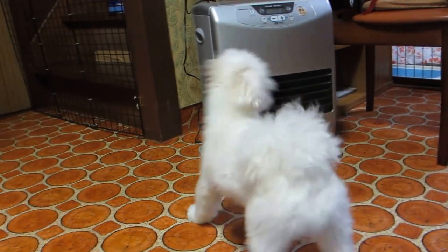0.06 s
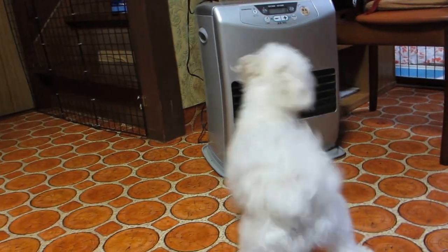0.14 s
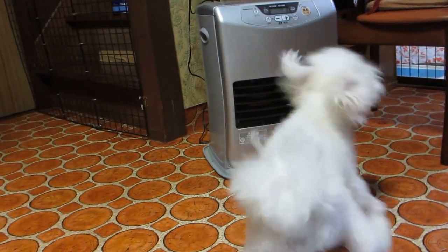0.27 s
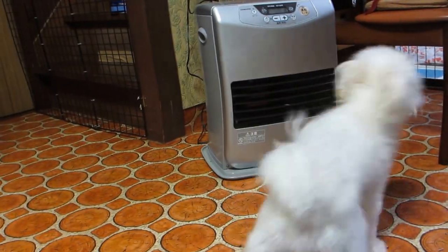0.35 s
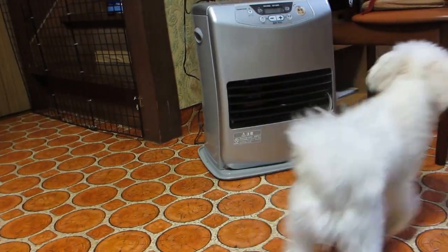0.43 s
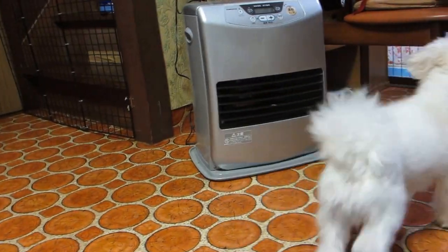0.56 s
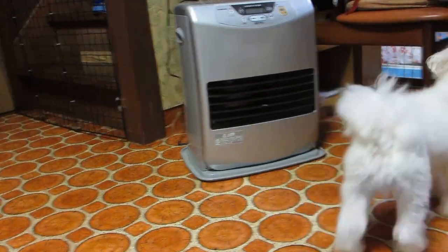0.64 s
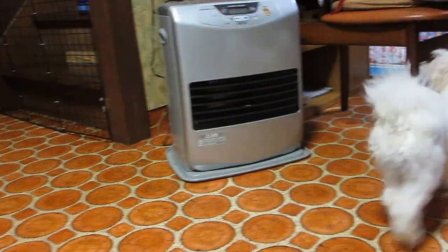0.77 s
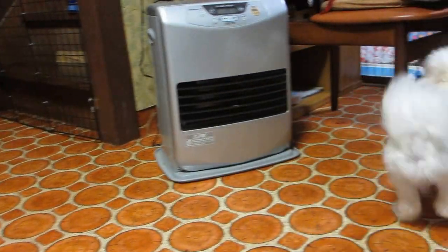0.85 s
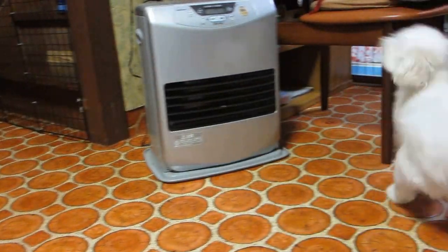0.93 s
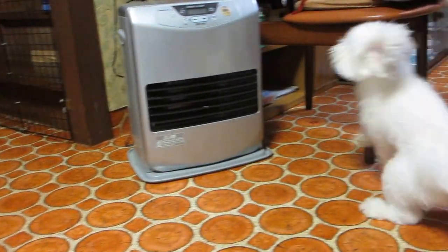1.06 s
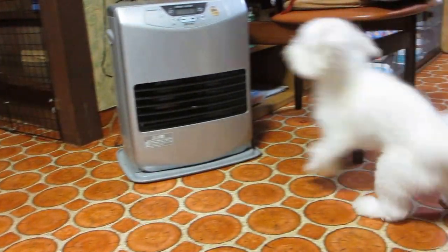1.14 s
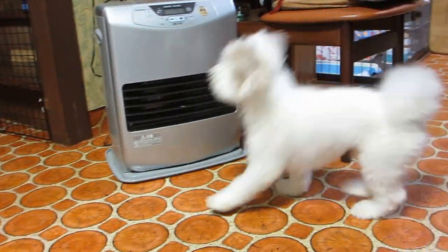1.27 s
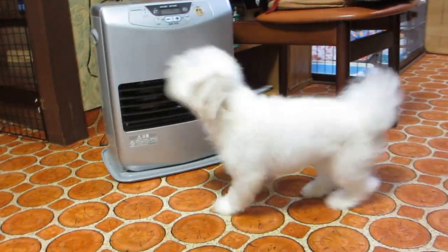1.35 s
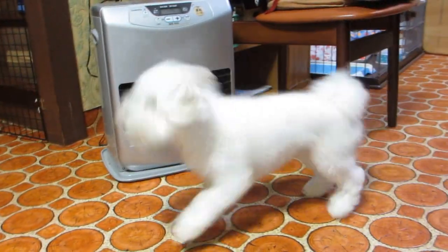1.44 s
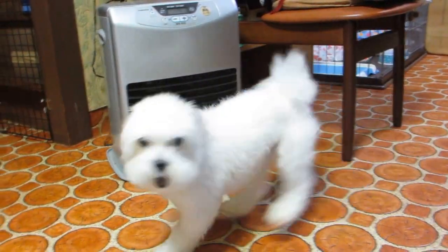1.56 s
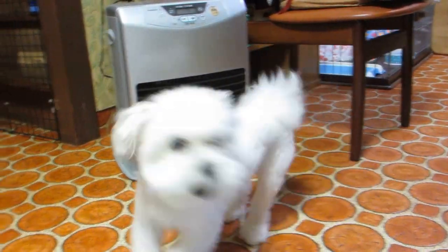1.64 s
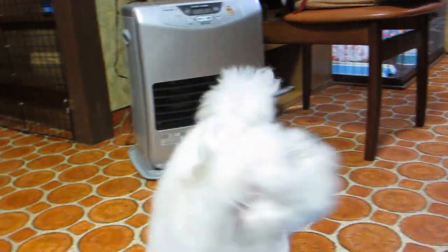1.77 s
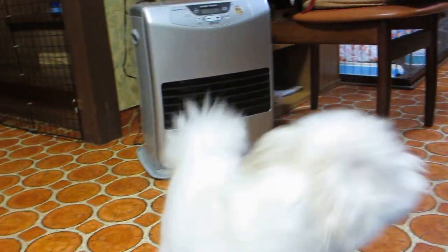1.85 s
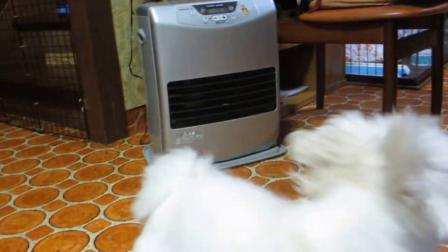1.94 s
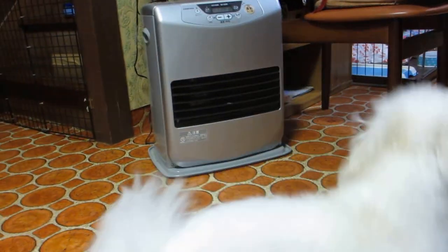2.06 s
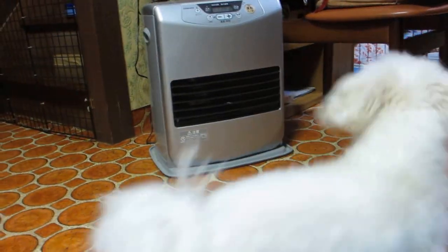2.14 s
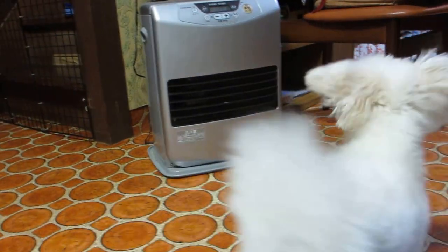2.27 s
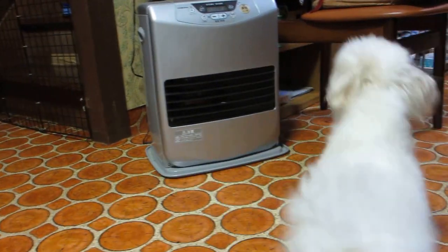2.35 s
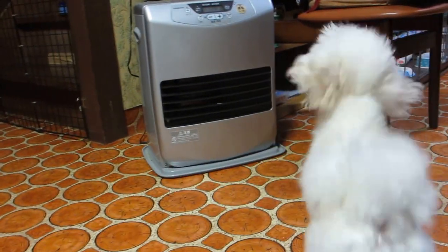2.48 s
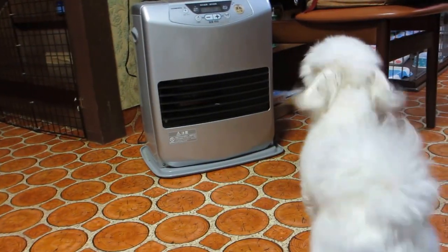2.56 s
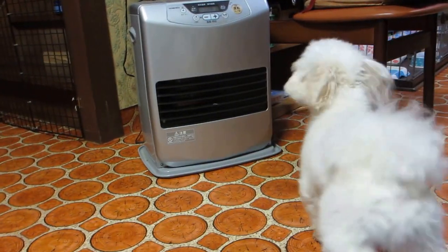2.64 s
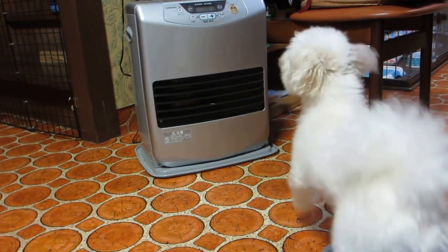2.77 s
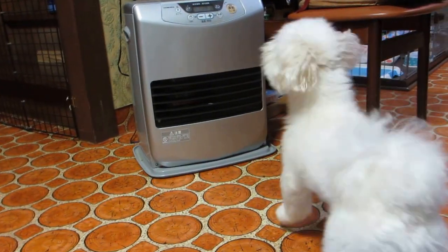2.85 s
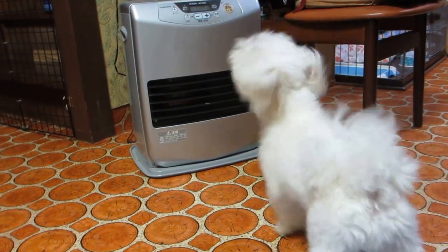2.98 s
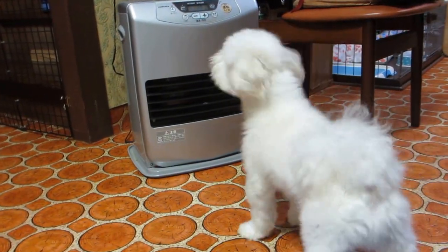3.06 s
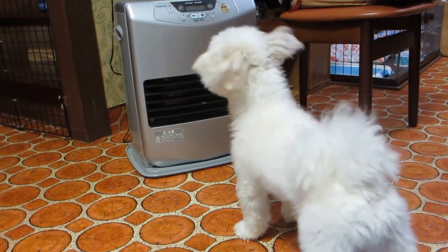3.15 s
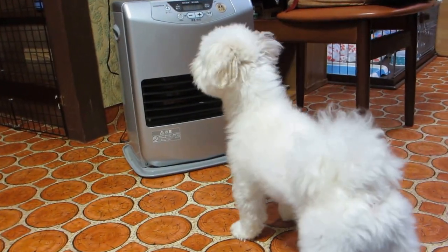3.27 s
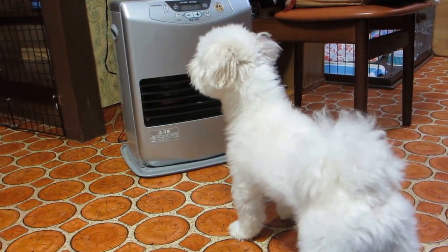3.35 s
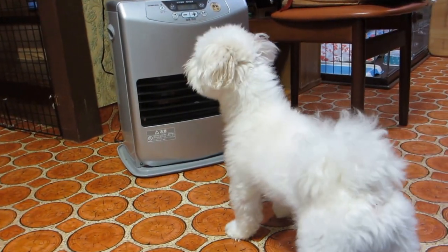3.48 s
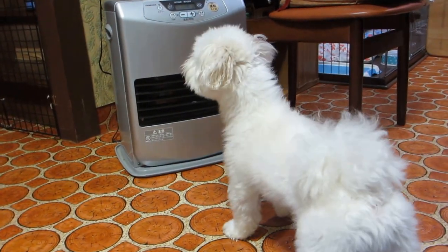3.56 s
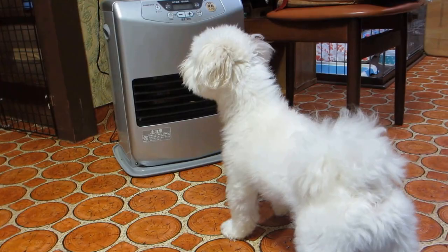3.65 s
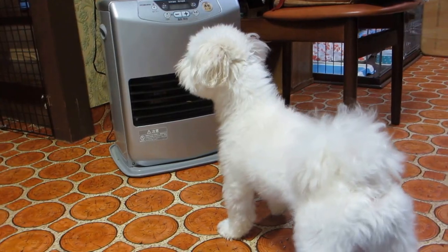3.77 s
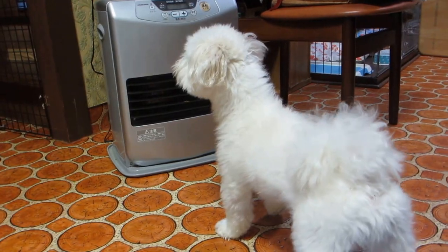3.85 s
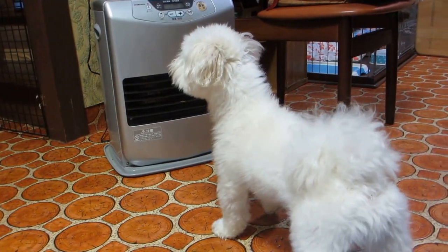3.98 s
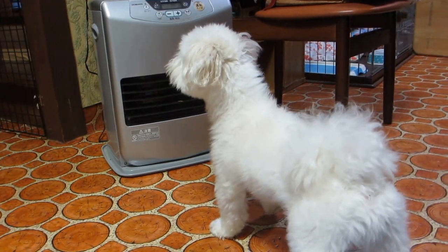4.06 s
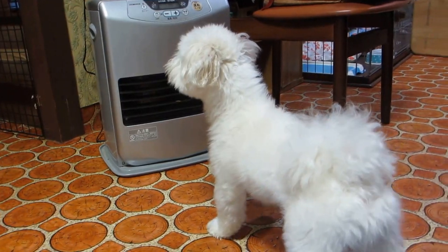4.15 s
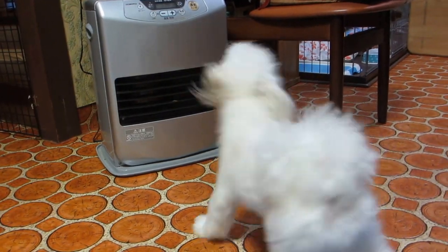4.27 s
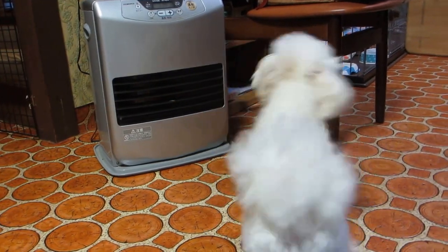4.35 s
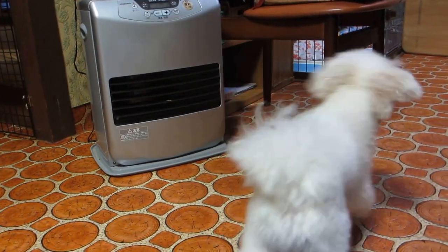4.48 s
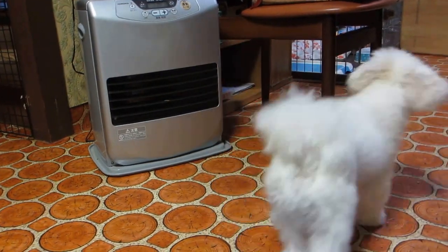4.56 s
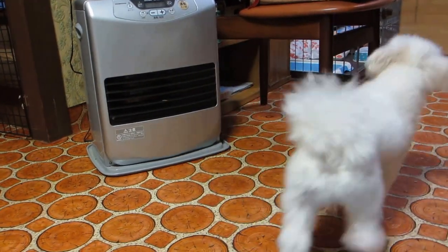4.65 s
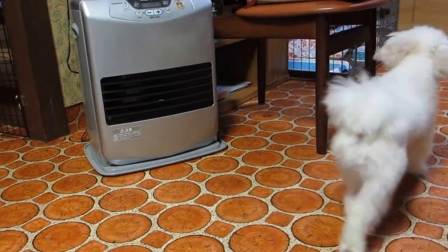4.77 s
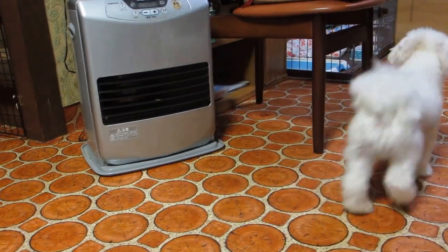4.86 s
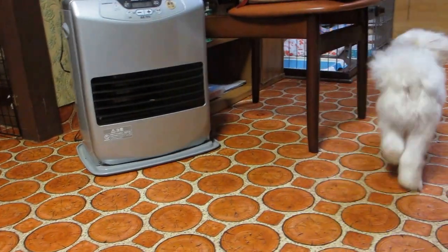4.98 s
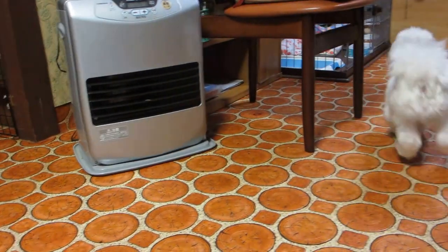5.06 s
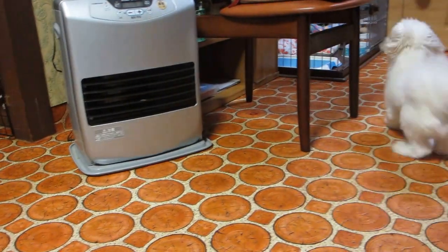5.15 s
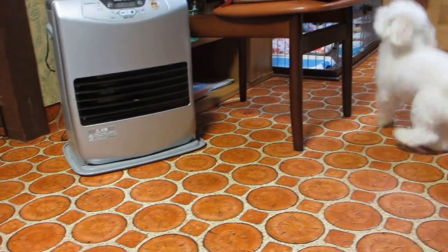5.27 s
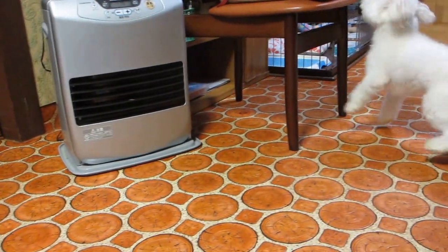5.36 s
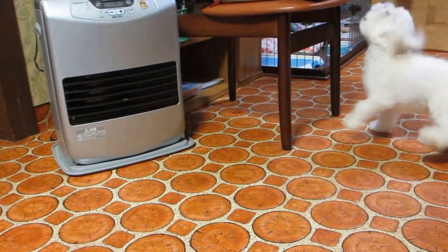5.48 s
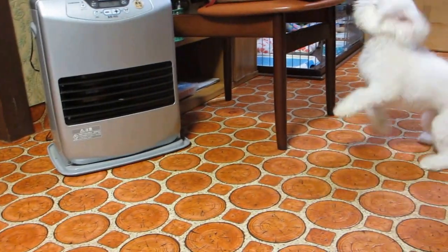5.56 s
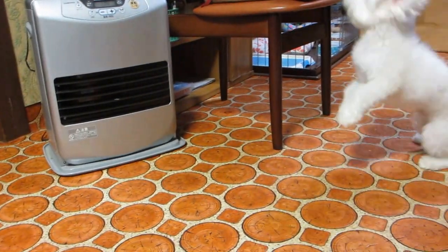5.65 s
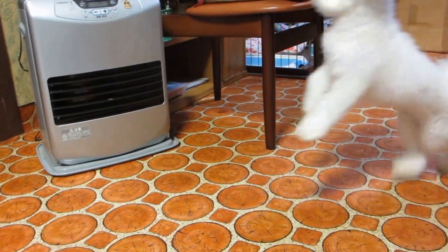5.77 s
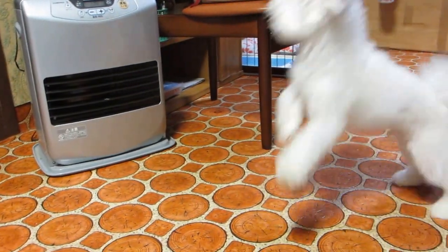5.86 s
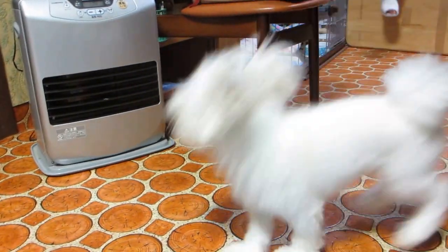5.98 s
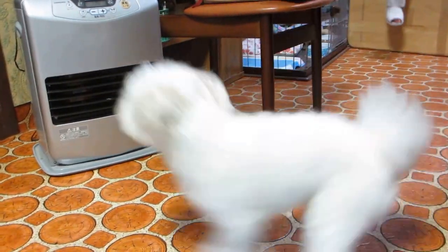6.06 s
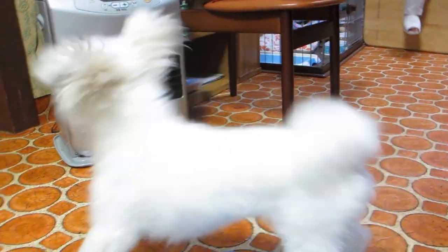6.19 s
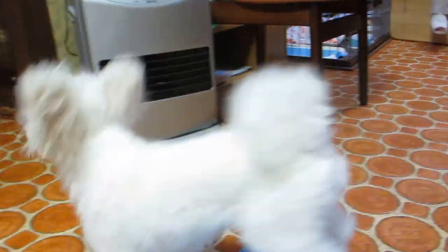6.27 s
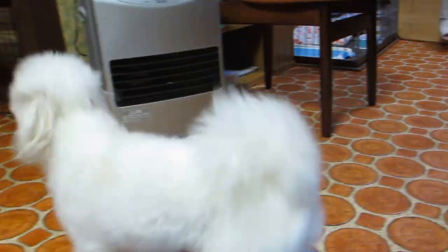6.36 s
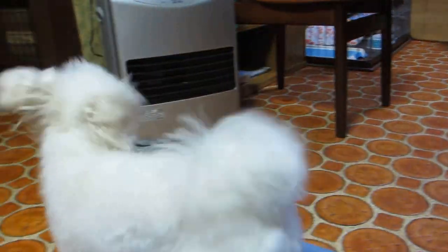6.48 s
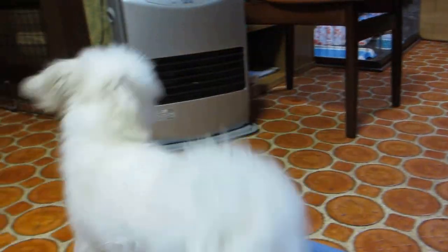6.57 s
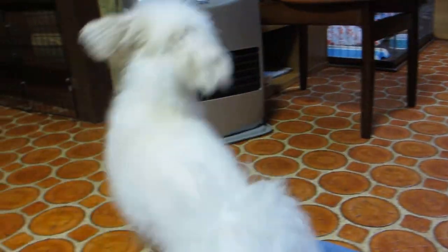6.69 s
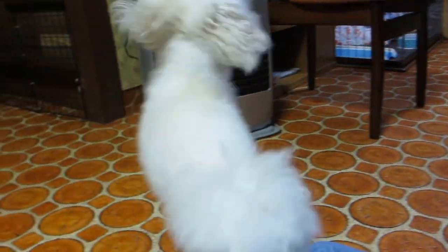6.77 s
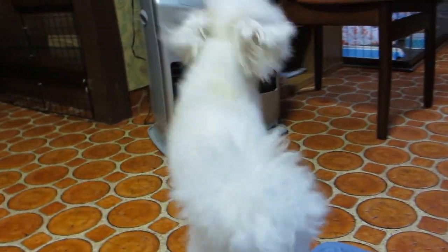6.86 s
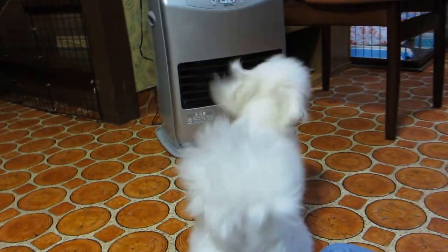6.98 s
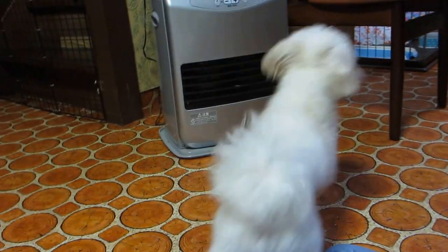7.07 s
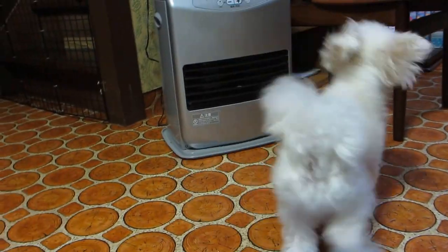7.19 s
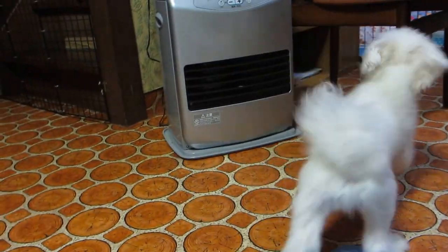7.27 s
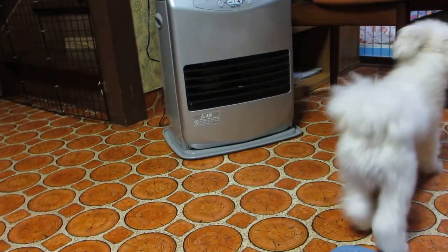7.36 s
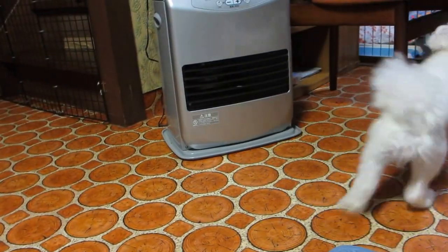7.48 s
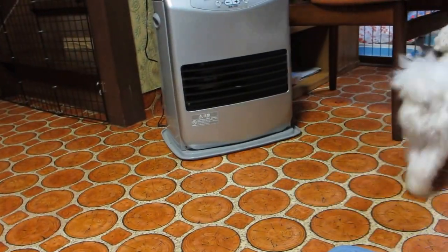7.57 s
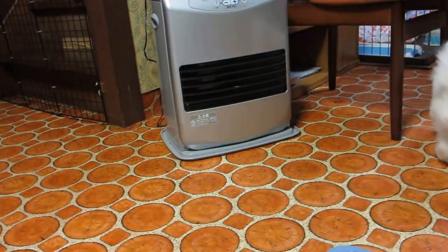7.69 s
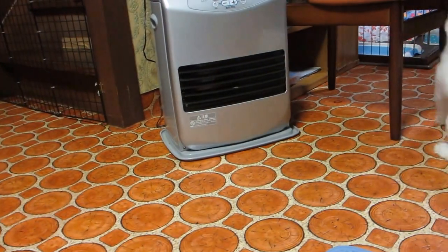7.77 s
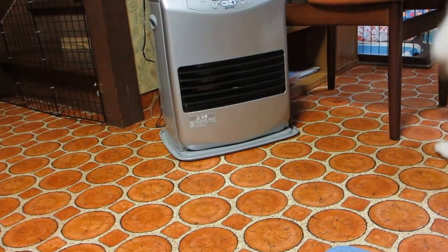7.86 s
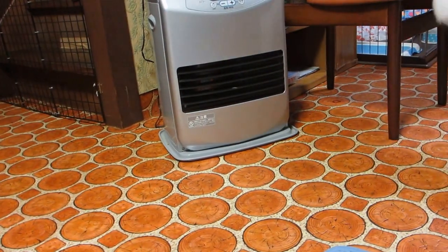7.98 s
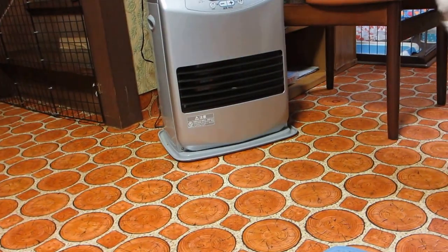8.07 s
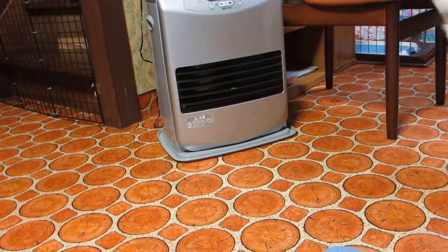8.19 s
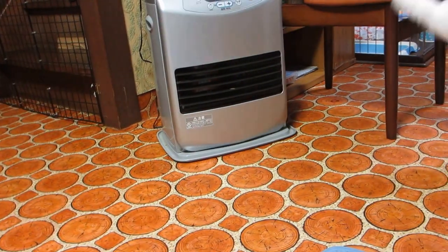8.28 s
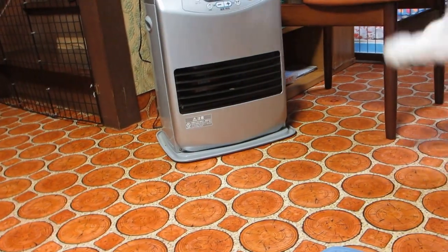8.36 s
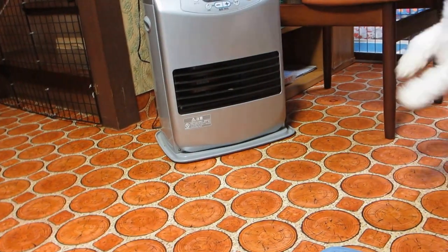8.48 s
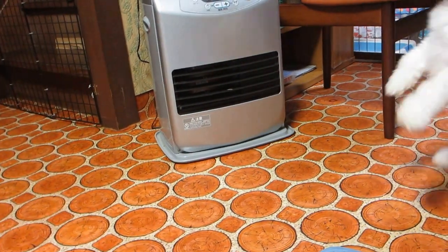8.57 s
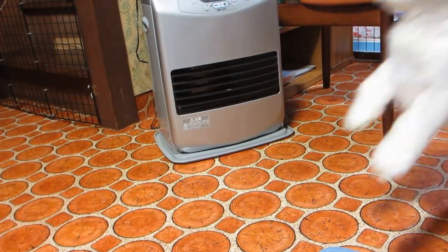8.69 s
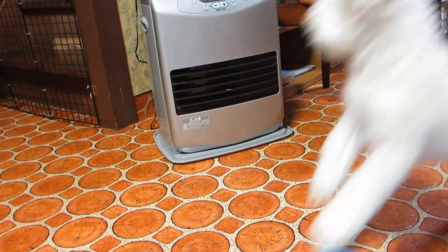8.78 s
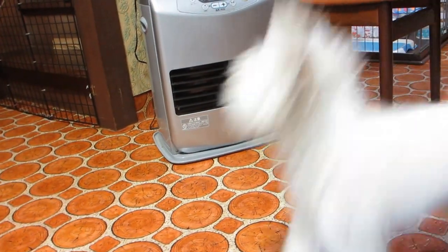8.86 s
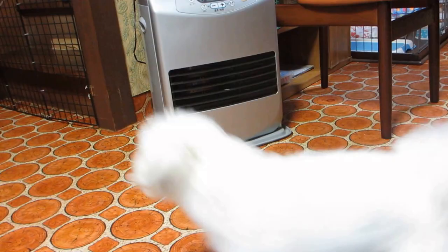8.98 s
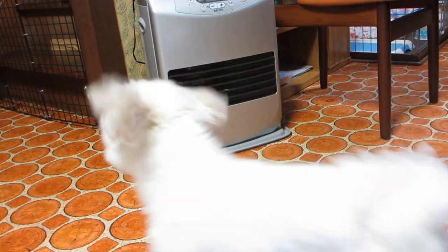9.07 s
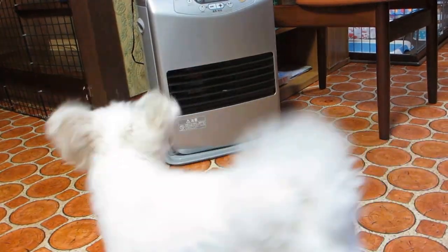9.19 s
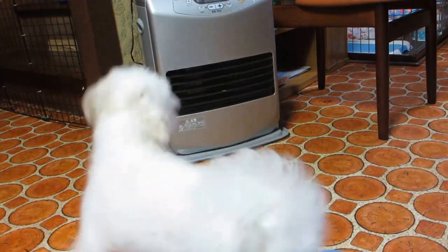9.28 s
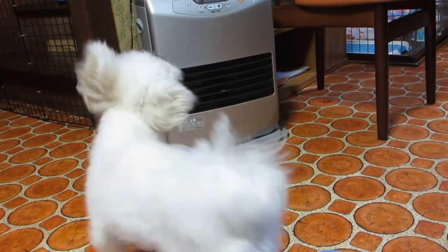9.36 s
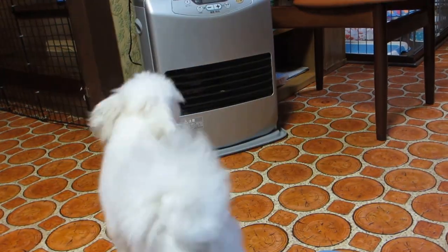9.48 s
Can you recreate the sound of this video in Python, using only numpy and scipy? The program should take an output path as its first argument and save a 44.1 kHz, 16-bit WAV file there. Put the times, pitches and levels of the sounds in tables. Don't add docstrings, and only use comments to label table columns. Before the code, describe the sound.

A small dog barks hoarsely and yelps high and clear, over and over, in a hard-floored room, with soft paw thuds and claw scuffs.

```python
import sys
import numpy as np
from scipy import signal
from scipy.fft import rfft, irfft, next_fast_len
from scipy.io import wavfile
from scipy.ndimage import uniform_filter1d, minimum_filter1d, map_coordinates

SR = 44100
rng = np.random.default_rng(int(sys.argv[2]) if len(sys.argv) > 2 else 0)


def file_out(sig):
    cols = np.atleast_2d(sig).T
    lim = np.clip(cols, -1, 1)
    pcm = np.round(lim * 32767).astype(np.int16)
    wavfile.write(sys.argv[1], SR, pcm)


def gain_from_db(level_db):
    decades = np.asarray(level_db, float) / 20
    return 10 ** decades


N = 420273

# (time [s], step after [s], voice breaks after [s], first pitch [Hz], top pitch [Hz])
YELPS = [
    (0.667, .013, .112, 1271, 2024),
    (1.746, .021, .1, 1233, 1674),
    (2.049, .033, .101, 1173, 1791),
    (4.714, .012, .115, 1374, 1731),
    (5.017, 0.052, .086, 1390, 1579),
    (5.436, .04, .112, 1120, 1756),
    (5.877, .05, .112, 1212, 1694),
    (7.554, .02, 0.078, 1257, 1487),
    (8.102, .022, .1, 1214, 1557),
]
# (onset [dB], after the step [dB], at the break [dB], last gasp [dB], duration of the step [s])
YELP_EFFORT = [
    (-19.5, -28, -44, -60, 0.048),
    (-8.5, -11.5, -21, -32, .02),
    (-22.5, -20.5, -26, -51, .03),
    (-18.5, -12.5, -19, -56, .04),
    (-26.5, -28, -27.5, -51, .015),
    (-12.5, -16, -12.5, -46.5, .018),
    (-17, -14, -16.5, -37, .013),
    (-23, -21, -23.5, -59.5, .012),
    (-15, -16, -13.5, -39, .014),
]
# (time [s], climb [s], first pitch [Hz], last pitch [Hz], peak level [dB])
SCOOPS = [
    (0.926, .037, 814, 1176, -11),
    (7.105, .046, 678.6, 716, -14),
    (8.512, .036, 661, 1174, -13),
]
# (time [s], length [s], top pitch [Hz], onset level [dB], middle level [dB])
HOARSE_BARKS = [
    (0.198, 0.16, 1258, -15, -16.5),
    (2.932, 0.15, 1241, -21, -17),
    (4.268, .155, 1187, -22, -17.5),
    (6.325, .138, 1260, -14, -15.5),
    (9.331, .16, 1210, -18, -15),
]
# (time [s], length [s], top pitch [Hz], onset level [dB], middle level [dB])
SHARP_BARKS = [
    (2.467, .134, 1197, -11, -16.5),
    (8.862, .14, 1210, -11, -16.5),
]
# (time [s], onset peak after [s], crack after [s], squeal [Hz], onset level [dB])
CRACKED_BARKS = [
    (1.319, .021, .078, 1904, -7.5),
    (6.763, .035, .095, 1741, -9),
]
# (mouth resonance [Hz], overtones [dB], facing the camera [dB], left-right [dB])
MUZZLE = [(1120, -26.5, -1, 0.7), (900, -14, -3, -0.5), (1058.5, -17.5, -2, 1.4), (1263, -21.5, -2.5, 0.7),
          (901, -19.5, -6, -0.5), (790, -13, -7, 0.5), (1085, -21.5, -7.5, 0), (950, -32.5, -5, 1.5),
          (980, -36, -5, 1.5), (830, -14.5, 2.5, -0.5), (800, -8.5, -1.5, 0.4), (856, -16, -0.8, 0.2),
          (850, -13.5, 1, 0.5), (1066, -27, -5, 0.5), (1210, -23, -7, 1.5), (1000, -20.5, -8, 0.3),
          (780, -12, -4.5, 0.9), (920, -20, -5.5, 0.8), (1010, -14, -0.6, 2), (1150, -19, -5, 0.7),
          (1080, -37.5, -6, 1.7)]
# (frequency [Hz], level [dB])
THROAT = [(200, -50), (400, -20.5), (600, -20.5), (850, -3.5), (1150, 2.5), (1800, -6), (3000, 4),
          (3700, -8), (5000, -14), (7000, -27.5), (10000, -23.5), (15500, -38)]
# (multiple of the mouth resonance [1], density [dB per Hz])
RASP = [(.14, -47.5), (.3, -41), (.55, -23.5), (.78, -8.5), (1, -6.5), (1.25, -5), (1.55, -5), (2, -19.5),
        (3.1, -32), (4.6, -49), (7.3, -69.5)]
# (frequency [Hz], density [dB per Hz])
HISS = [(3000, -33.5), (5000, -12.5), (7000, -13), (10000, 1.5), (13000, -2.5), (15600, -15)]
# (time [s], peak level [dB], pitch [Hz])
PAWS = [(0.116, -53.5, 122), (0.239, -42.5, 206), (0.933, -43, 144), (1.325, -46.5, 164.2),
        (1.639, -46, 96.6), (1.883, -48.5, 101.8), (2.076, -47, 89.2), (2.365, -45.5, 96.7),
        (2.808, -47, 69.7), (4.228, -45, 72.4), (4.43, -53, 161), (4.628, -50, 74.5), (4.729, -42.5, 104.5),
        (5.448, -51, 148.5), (5.576, -49, 154), (6.006, -42, 63), (6.144, -36.5, 86.2),
        (6.429, -47.5, 60.8), (6.8, -48.5, 207), (7.029, -50.5, 83.7), (7.27, -48.5, 69.1),
        (7.776, -47, 156.2), (7.967, -42.5, 76.5), (8.14, -36, 99.7), (8.253, -41.5, 152.6),
        (8.415, -50.5, 152.1), (8.794, -43.5, 82.5), (8.914, -48.5, 117.5), (9.033, -49, 66.6),
        (9.368, -48, 191.9)]
# (time [s], peak level [dB], decay by 60 dB [s])
CLAWS = [
    (0.119, -57, 0.1),
    (3.87, -72.5, 0.1),
    (4.199, -56.5, 0.079),
    (5.299, -47.5, 0.18),
    (6.183, -43.5, 0.22),
    (7.971, -45.5, 0.15),
]
# (time [s], peak level [dB])
TICKS = [
    (5.7886, -55),
    (5.8396, -63),
    (7.0329, -62),
    (7.4344, -70.5),
    (7.8216, -70),
    (7.9129, -65.5),
    (7.9731, -58),
    (8.797, -70),
]
# (time [s], floor shaking level [dB])
SHUFFLE = [(0.0, -70), (0.9, -65), (1.8, -70), (2.4, -66), (3.05, -69.5), (3.3, -92), (4.15, -86),
           (4.4, -68), (5.2, -66), (6.15, -61.5), (6.6, -72), (7.8, -72.5), (8.12, -64.5), (8.5, -69.5),
           (9.53, -71)]
# (frequency [Hz], density [dB per Hz])
SCUFF = [(120, -33), (200, -6), (528, -9), (1120, -9.5), (1510, -16), (1830, -21), (9000, -47),
         (11700, -87.5), (19800, -120)]
# (frequency [Hz], density [dB per Hz])
BOARDS = [(25, -20.5), (45, -6), (70, -1), (110, -6), (170, -12), (300, -25), (600, -59.5)]
# (frequency [Hz], density [dB per Hz])
FUR = [(600, -30), (2000, -4), (5000, -3), (11000, -6), (15500, -16)]
# (frequency [Hz], density [dB per Hz])
FAN = [
    [(25, -6.5), (60, -1), (90, -10), (400, -13.5), (800, -18), (1150, -14.5), (1600, -20), (2900, -38.5),
     (5000, -48.5), (15000, -48)],
    [(25, -4.5), (170, -3.5), (370, -9), (480, -8.5), (620, -10.5), (2500, -41), (15000, -57)],
]
FAN_LEVELS = [-72, -65]
# (frequency [Hz], decay by 60 dB [s])
ROOM = [(200, 0.53), (1200, 0.34), (2500, 0.37), (5000, 0.38), (12000, 0.36)]
# (frequency [Hz], gain [1])
APART = [(100, 0.87), (600, 0.18), (2000, 0.24), (5000, 0.52), (10000, 1)]
# (frequency [Hz], left leads by [radians])
LEAD = [(60, -2.4), (200, -1.9), (520, -1.3), (1250, -1.5), (1800, -.5), (2500, -.3), (5000, 0)]
# (frequency [Hz], left-right [dB])
TILT = [(60, 6.5), (150, 8), (350, 10), (700, 4.5), (1300, -4.5), (4400, -3.5), (8000, -7.5), (14000, -4)]

SNAP_S, SNAP_DB = .006, 12
CREEP_HZ_PER_S, CREEP, STEP_REACH = 3300, .33, .86
BREAK_S, GASP_S, SLACK_HZ, ROUGH_PER_DB = .02, .055, 870, 0.04
SCOOP_HELD_S, SCOOP_TO_HZ, SCOOP_FADE_S, SCOOP_FADE_DB = .086, 1211, .07, 23.5
RISE, MIDDLE, LATE, SAG = .17, .42, .69, 0.75
GROWL_DB, GROWL_DB_PER_KHZ, DOUBLING_DB = 0.53, 42, -13
FOCUS, FOCUS_WIDTH_HZ = 0.65, 140
UPPER, UPPER_FOCUS = 1.55, 0.62
THUD_T60_S = 0.13
CEILING = .8


def dog():
    yelps = [yelp(*row, *effort) for row, effort in zip(YELPS, YELP_EFFORT)]
    clear = yelps + [scoop(*row) for row in SCOOPS]
    sharp = [bark(*row, first_hz=780, rough=0.37) for row in SHARP_BARKS]
    sharp += [cracked(*row) for row in CRACKED_BARKS]
    hoarse = [bark(*row, first_hz=1059.6, rough=0.53) for row in HOARSE_BARKS]
    calls = [(rows, count) for count, group in [(1, clear), (2, sharp), (3, hoarse)] for rows in group]
    out = np.zeros((2, N))
    for (mouth_hz, overtone_db, facing_db, pan_db), (rows, repeat) in zip(MUZZLE, sorted(calls)):
        between_db = GROWL_DB - GROWL_DB_PER_KHZ * (mouth_hz / 1000 - 1) if repeat > 2 else DOUBLING_DB
        call = gain_from_db(-2.0) * voice(mouth_hz, repeat, between_db, overtone_db, facing_db, np.array(rows))
        pan = gain_from_db([[pan_db / 2], [-pan_db / 2]])
        add(out, call * pan, rows[0][0])
        add(out, room(call) * pan, rows[0][0])
    return out


def yelp(s, step, end, first_hz, top_hz, onset_db, stepped_db, end_db, gasp_db, glide):
    slack = ROUGH_PER_DB * (end_db - gasp_db)
    rise_hz = top_hz - first_hz
    crept_hz = first_hz + min(CREEP_HZ_PER_S * step, CREEP * rise_hz)
    return [(s, first_hz / 1.03, onset_db - SNAP_DB, .02),
            (s + SNAP_S, first_hz, onset_db, .06),
            (s + step, crept_hz, (onset_db + stepped_db) / 2 + 0.2, .04),
            (s + step + glide, first_hz + STEP_REACH * rise_hz, stepped_db, .07),
            (s + end, top_hz, end_db, .07),
            (s + end + BREAK_S, .79 * top_hz, (end_db + gasp_db) / 2 + 1.07, .45 * slack),
            (s + end + GASP_S, SLACK_HZ, gasp_db, slack)]


def scoop(s, climb, first_hz, last_hz, db):
    held = s + SCOOP_HELD_S
    return [(s, first_hz, db - 15.5, .3),
            (s + climb / 2, .6 * first_hz + .4 * SCOOP_TO_HZ, db - 8.5, .33),
            (s + climb, .955 * SCOOP_TO_HZ, db, .07),
            (held, SCOOP_TO_HZ, db - 3.5, .05),
            (held + 0.39 * SCOOP_FADE_S, 0.33 * SCOOP_TO_HZ + .6 * last_hz, db - 15, .15),
            (held + SCOOP_FADE_S, last_hz, db - SCOOP_FADE_DB, .15)]


def bark(s, length, top_hz, onset_db, middle_db, first_hz, rough):
    return [(s, first_hz, onset_db - 17, .2),
            (s + RISE * length, .92 * top_hz, onset_db, rough),
            (s + MIDDLE * length, .98 * top_hz, middle_db, rough + 0.13),
            (s + LATE * length, .99 * top_hz, middle_db - 8, .75),
            (s + length, SAG * top_hz, middle_db - 21.5, .8)]


def cracked(s, rise, crack, squeal_hz, db):
    return [(s, 780, db - 32, .4),
            (s + .55 * rise, 960, db - 12.5, .55),
            (s + rise, 1180, db, .2),
            (s + rise + .025, 1305, db - 8.5, .4),
            (s + crack, 1340, db - 8.5, .45),
            (s + crack + .014, squeal_hz, db - 12.5, .13),
            (s + crack + 0.044, .97 * squeal_hz, db - 14.5, .2),
            (s + crack + 0.065, SLACK_HZ, db - 23, .35)]


def voice(mouth_hz, repeat, between_db, overtone_db, facing_db, rows):
    s, pitch, effort_db, rough = rows.T
    t = s[0] + np.arange(SR // 5) / SR
    size, age = len(t), t - s[0]
    pitch = np.interp(t, s, pitch)
    rough = np.clip(np.interp(t, s, rough), 0, 1)
    level = np.interp(t, [*s, s[-1] + .015], [*gain_from_db(effort_db), 0]) * (1 - np.exp(-age / 0.0024)) ** 2
    phase = 2 * np.pi * np.cumsum(pitch) / SR

    k = np.arange(1, 9 * repeat + 1)[:, None] / repeat
    loose = (rough + 0.015) * np.clip(1.7 * k - .3, 0, 1)
    weight_db = along(THROAT, k * pitch) + overtone_db * np.clip(1.752 * k - 1.9, 0, 1)
    weight_db += between_db * (k % 1 > 0)
    weight_db -= 5 * np.clip(k - 1, 0, None) * np.exp(-age / 0.028)
    weight_db += 6 * np.log10(level / level.max() + 0.037) * np.clip(k - 1, 0, 2)
    sway = np.cos(2.325 * k) * wobble(112, size) + np.sin(2.11 * k) * wobble(69.54, size)
    weight_db += (9 * loose + 1.5 * np.minimum(k, 2)) * np.minimum(sway, 1.1) + 5 * rough * (k < .5)
    jitter = 2.14 * np.minimum(k, 3) * loose * wobble(300, size)
    lines = np.sum(gain_from_db(weight_db) * np.sin(k * phase + jitter), axis=0)

    aspiration = gain_from_db(-32.5) * noise([(900, -30.5), (1600, 3), (3600, -6.0), (5500, -18.5), (9000, -45)], size)
    puffs = 1 + 0.54 * np.sin(phase / repeat)
    rasp = 0.96 * rough ** 1.54 * puffs * noise(np.multiply(RASP, [mouth_hz, 1]), size)
    hiss_level = gain_from_db(-41.5 + 4.0 * wobble(97, size)) * (1 + 1.6 * rough)
    hiss = hiss_level * np.minimum(age / 0.026, 1) ** 0.91 * noise(HISS, size)

    def mouth(hz):
        beam = gain_from_db(facing_db / (1 + (4000 / (hz + 1)) ** 6))
        first = FOCUS * (repeat > 2) / (1 + ((hz - 1.03 * mouth_hz) / FOCUS_WIDTH_HZ) ** 2)
        second = UPPER_FOCUS * (repeat > 1) / (1 + ((hz - UPPER * mouth_hz) / FOCUS_WIDTH_HZ) ** 2)
        return (1 + first + second) * beam / (1 + (280 / (hz + 1)) ** 4)

    voiced = np.sqrt(np.clip(2 - 1.64 * rough, .1, 2)) * lines
    return filtered(level * (voiced + rasp + aspiration + hiss), mouth)


def feet():
    s, shake_db = np.transpose(SHUFFLE)
    shake_db = np.interp(np.arange(N) / SR, s, shake_db)
    floor = gain_from_db(shake_db + 1 + 5 * wobble(12, N)) * noise(BOARDS, N)
    t = np.arange(SR // 4) / SR
    for s, db, hz in PAWS:
        spectrum = [(hz / 3, -24), (hz * .7, 0), (hz * 2.0, 0), (hz * 3, -22), (1500, -50), (6000, -100)]
        decay = gain_from_db(db + 2.5 - 60 * t / THUD_T60_S)
        add(floor, decay * (1 - np.exp(-t / 0.0056)) * noise(spectrum, len(t)), s)
    for s, db, t60 in CLAWS:
        decay = gain_from_db(db - 2 - 60 * t / t60)
        add(floor, decay * (1 - np.exp(-t / 0.0027)) * noise(SCUFF, len(t)), s)
    tips = gain_from_db(shake_db - 27 + 7.6 * wobble(7, N)) * noise(FUR, N)
    for s, db in TICKS:
        add(tips, gain_from_db(db + 1.5 - 60 * t / .009) * noise(HISS, len(t)), s)
    return floor + gain_from_db(-0.5) * room(floor)[:, :N] + tips + gain_from_db(-11) * room(tips)[:, :N]


def fan():
    common, opposite = [gain_from_db(db + 2.3 * wobble(4.1, N)) * noise(spectrum, N)
                        for db, spectrum in zip(FAN_LEVELS, FAN)]
    return np.array([common + opposite, common - opposite])


def room(x):
    hz, t, z = signal.stft(rng.standard_normal((2, SR // 2)), SR, nperseg=256)
    z = z * gain_from_db(-60 * t / along(ROOM, hz)[:, None])
    z = z * (1 + 1.15 * np.exp(-t / 0.014))
    z = z * np.array([hz * 0 + 1, along(APART, hz)])[..., None]
    common, apart = signal.istft(z, SR, nperseg=256)[1]
    tail = np.array([common + apart, common - apart]) / np.linalg.norm(common)
    delayed = np.pad(x, (300, 0))
    return signal.fftconvolve(delayed[None], tail, axes=1)


def along(points, hz):
    f, v = np.transpose(points)
    return np.interp(np.log(hz + 1), np.log(f + 1), v)


def unit(x):
    return x / np.sqrt(np.mean(x ** 2) + 1e-20)


def filtered(x, response):
    m = next_fast_len(x.shape[-1] + 2048)
    spectrum = rfft(x, m) * response(np.fft.rfftfreq(m, 1 / SR))
    return irfft(spectrum, m)[..., :x.shape[-1]]


def noise(spectrum, size):
    return unit(filtered(rng.standard_normal(size), lambda hz: gain_from_db(along(spectrum, hz))))


def wobble(rate, size):
    knots = rng.standard_normal(size // 20 + 4)
    return map_coordinates(knots, [np.arange(size) * rate / SR])


def add(track, x, s):
    part = track[..., round(s * SR):][..., :x.shape[-1]]
    part += x[..., :part.shape[-1]]


def scene():
    def half(hz):
        return gain_from_db(along(TILT, hz) / 2) * np.exp(.5j * along(LEAD, hz))

    return filtered(dog() + feet(), lambda hz: np.array([half(hz), 1 / half(hz)])) + fan()


def roll_off(x):
    return signal.sosfilt(signal.butter(12, 15700, fs=SR, output="sos"), x)


def record(dry):
    need = np.minimum(1, CEILING / (np.abs(dry).max(axis=0) + 1e-9))
    gain = uniform_filter1d(minimum_filter1d(need, size=441), size=221)
    return roll_off(dry * gain)


dry = scene()
out = record(dry)
file_out(out)
```